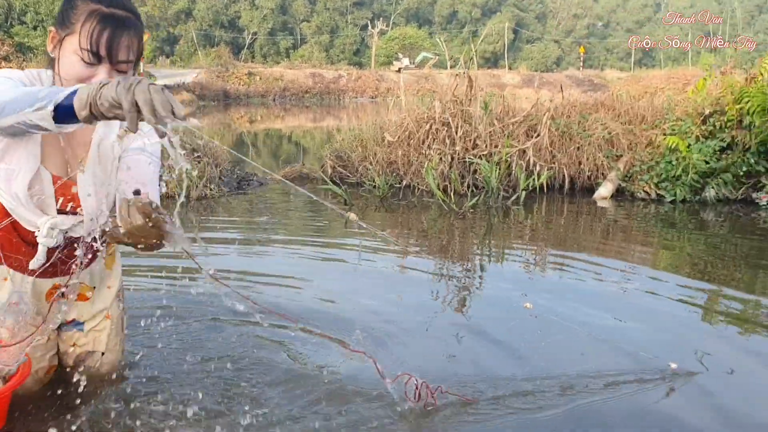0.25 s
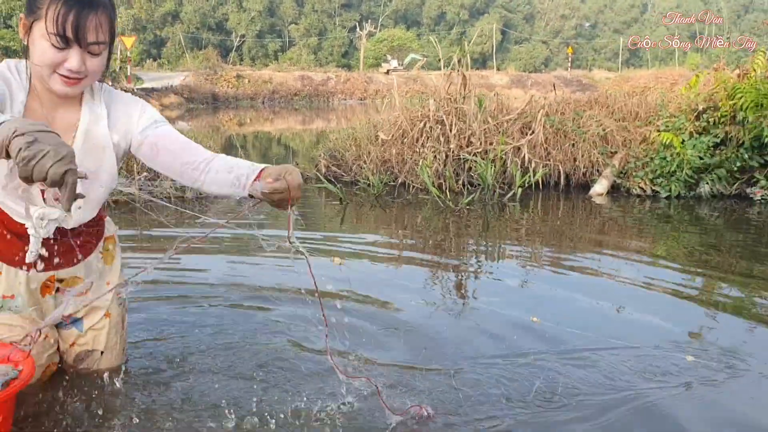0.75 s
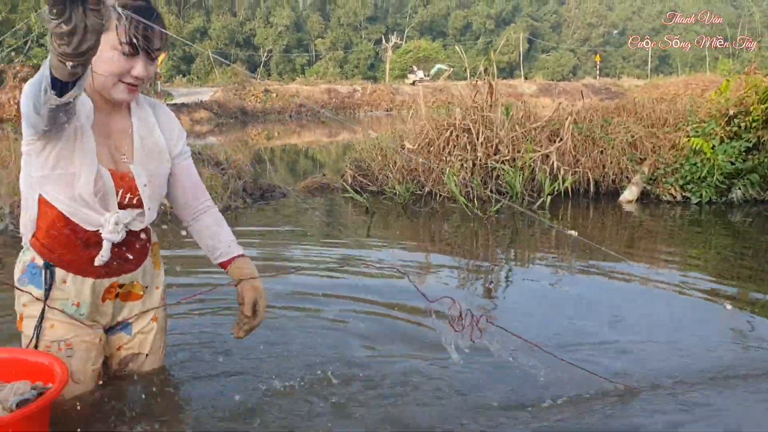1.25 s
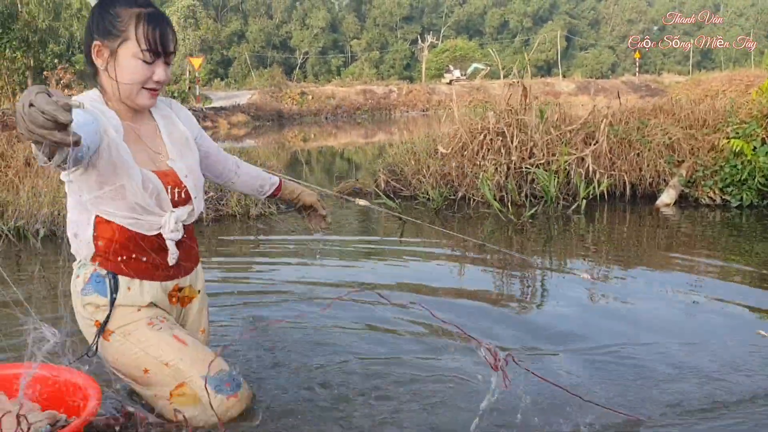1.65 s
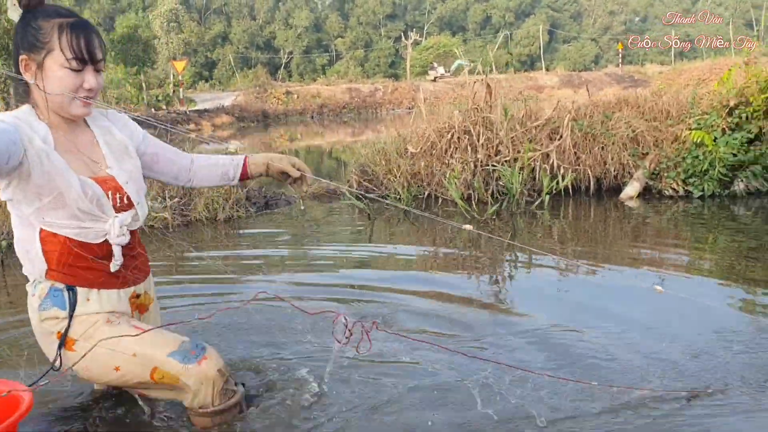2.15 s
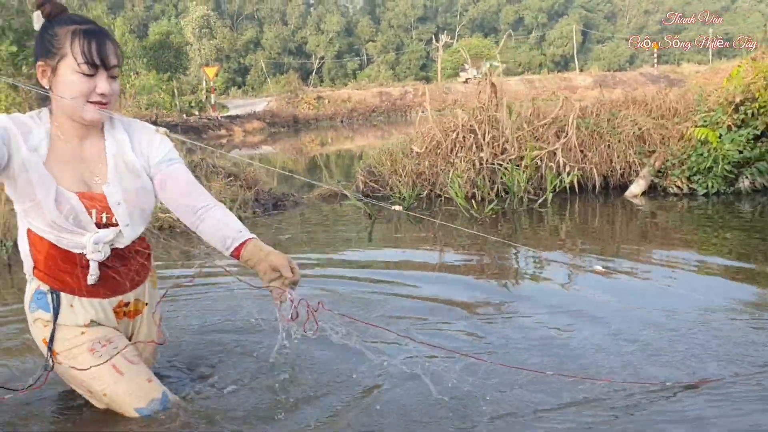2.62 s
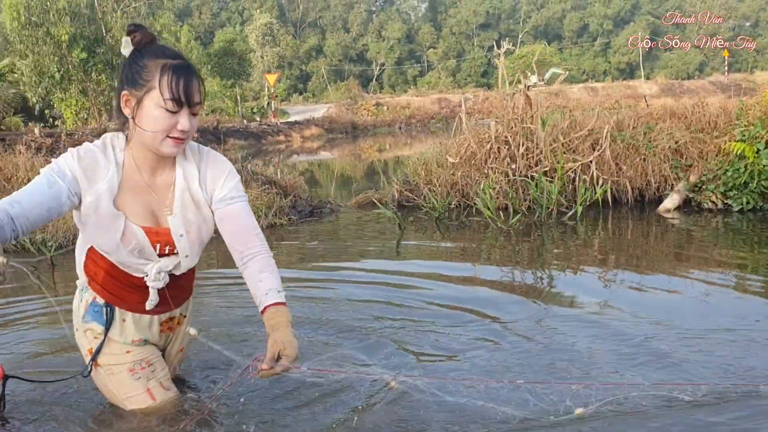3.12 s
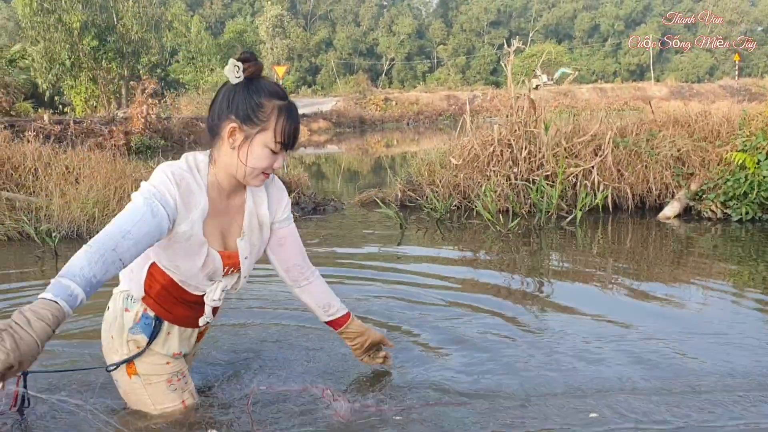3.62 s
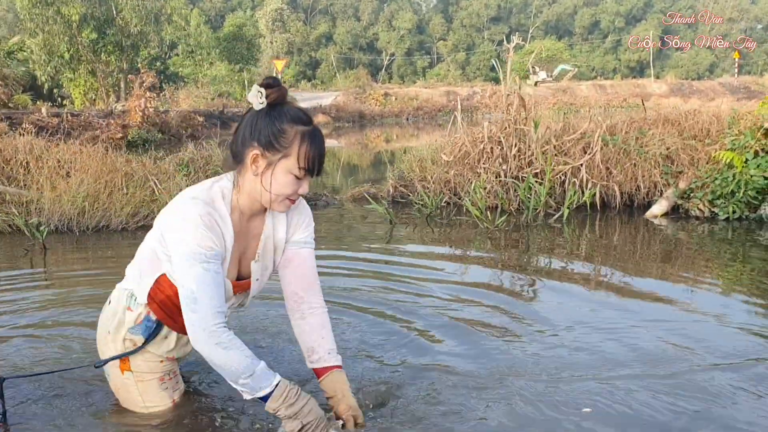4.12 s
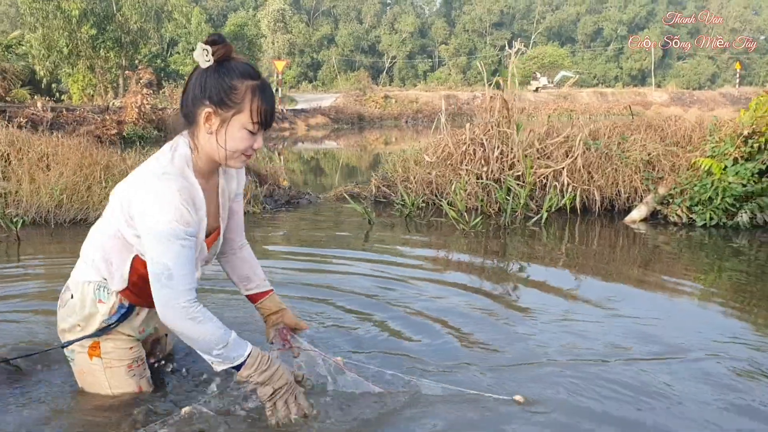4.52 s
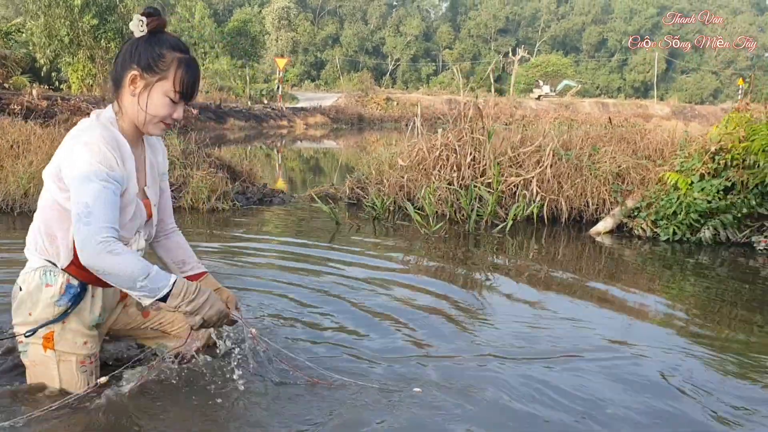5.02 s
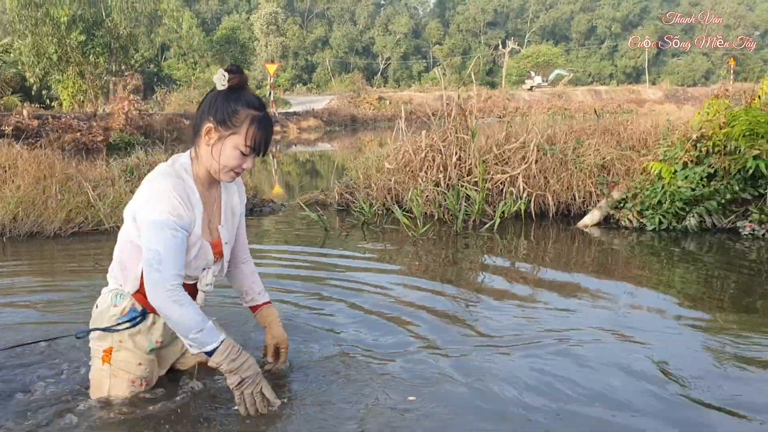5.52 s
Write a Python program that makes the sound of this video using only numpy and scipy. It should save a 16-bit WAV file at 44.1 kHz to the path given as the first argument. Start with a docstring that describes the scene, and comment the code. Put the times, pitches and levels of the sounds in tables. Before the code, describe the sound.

A person wades in a pond, heard close up outdoors. From 0 to 0.3 seconds water pours and sloshes with fizz and spray, then thins to drips. Bright, crisp droplet ticks cluster from 0.6 to 1.3, with small bubbles mostly rising in pitch. Rounder, deeper gurgles and plops come at 1.85 to 2.6. The water is mostly calm from 2.7 to 3.8, with one small swish near 3.3. Stirring returns at 3.8 to 4.4, and the strongest splashes come around 4.8 to 5.4, with more gurgles to 5.7. Low lumpy wind rumbles throughout, dipping and bumping near 3.6, while a far engine hum fades. High insects buzz in short bursts between 1.3 and 2.9, with a brief trill at 1.7 and a faint cricket afterwards. From 2.5 to 4.7 a distant bird repeats a soft, echoing note about four times a second, with two fainter reedy calls, over steady leafy hiss.

```python
"""Water sloshes, fizzes and drips close to the microphone as someone wades in a pond and hauls a line.
Drops tick as short damped tones, trapped bubbles ring, mostly rising in pitch; noise and grains make the rest.
Wind rumbles on the microphone as shaped noise and a far engine hums as narrow noise. A distant bird repeats
a soft note, with a reedier, fainter one beside it, both swept tones with echoes; three kinds of insect sing
on the bank as pulsed tones, before a steady far hiss of leaves and insect chorus."""
import sys
import numpy as np
from scipy import signal
from scipy.io import wavfile
from scipy.ndimage import uniform_filter1d

SR = 44100
rng = np.random.default_rng(int(sys.argv[2]) if len(sys.argv) > 2 else 0)


def put_to_file(sound):
    """Save the sound as 16-bit audio at rate SR, in the file named by the first command-line argument."""
    columns = np.atleast_2d(sound).T  # one column per channel
    safe = np.clip(columns, -1, 1)
    whole_steps = np.round(safe * 32767)
    wavfile.write(sys.argv[1], SR, whole_steps.astype(np.int16))


N = 254016
TIME = np.arange(N) / SR  # s

# All levels are set ahead of the microphone's own response.
# Large bubbles, close by. Each row: start in seconds, level in dB before wobble and surfacing gain,
# starting pitch in Hz, scale of the climb in octaves/s, ms until decay alone takes the ring down 60 dB.
BUBBLES = [(0.089, -27, 1043, 33.5, 51), (0.224, -23, 726, -11, 57), (0.302, -25.5, 289, 2.5, 140),
           (0.535, -30.5, 1095, 3, 81), (0.605, -41, 727, 18, 143), (0.7, -40, 1140, 8, 53),
           (0.754, -46.5, 596, 93, 91), (0.948, -23.5, 596, 6, 79), (0.971, -35, 806, 19.5, 105),
           (1.071, -28.5, 2130, -5, 28), (1.082, -35.5, 585, 19, 92), (1.093, -28, 1490, 28.5, 40),
           (1.113, -37, 518, 28.5, 123), (1.188, -27.5, 1510, 38, 20), (1.226, -32.5, 1080, 9, 47),
           (1.26, -42, 517, 72.5, 98.5), (1.281, -23.5, 1450, -4, 41), (1.313, -34.5, 1094, -3, 80),
           (1.845, -35.5, 357, 18, 140), (1.851, -26.5, 648, 19, 131), (1.866, -32.5, 890, 95, 52),
           (1.888, -20, 576, 10, 78), (1.904, -26, 523, 28.5, 80), (1.99, -31.5, 360, 10.5, 140),
           (2.168, -35, 717, 59.5, 70), (2.2, -30.5, 450, 12.5, 155), (2.253, -24.5, 433, 6, 73),
           (2.269, -19.5, 228.8, 9.5, 154), (2.411, -21.5, 1083, 26, 30), (2.527, -35, 702, 0, 141),
           (2.575, -38, 910, 19, 59), (2.923, -34.5, 647, 10, 89), (2.956, -47, 880, 61, 65),
           (4.035, -30.5, 295.4, 11, 152), (4.07, -31, 853, -2, 79), (4.731, -29, 332, 18, 98),
           (4.748, -25.5, 1127, -1, 62), (4.789, -23.5, 857, 8, 95), (5.011, -20.5, 862, 4, 57),
           (5.06, -18.5, 407, -4.5, 96), (5.027, -25.5, 270, 5.5, 109), (5.216, -22.5, 388, 12, 114),
           (5.256, -22, 625, 8, 69), (5.309, -25.5, 405.5, 25.5, 99), (5.53, -27, 1052, 19.5, 51),
           (5.67, -31, 643, -8, 86), (5.682, -28.5, 211, 8, 130)]
# Drops striking the surface, close by. Each row: start in seconds, level in dB before the onset and decay,
# centre in Hz, cycles until the ring is 60 dB down.
TICKS = [(0.062, -14, 4600, 16), (0.09, -20.5, 2110, 33), (0.12, -15.5, 3150, 37), (0.126, -20, 1810, 30),
         (0.219, -19.5, 3060, 35), (0.263, -17, 2100, 9), (0.283, -26, 2750, 22), (0.294, -24, 2050, 23),
         (0.315, -23.5, 1020, 31), (0.352, -23, 1260, 11), (0.4288, -21.5, 2360, 8),
         (0.5324, -20, 3020, 5.5), (0.605, -7, 8260, 1), (0.611, -22, 3380, 17), (0.6375, -9, 7460, 6),
         (0.652, -21, 3350, 20), (0.672, -17.5, 1640, 5.5), (0.712, -16, 3330, 5.5),
         (0.727, -13.5, 7740, 8), (0.7728, -13, 7700, 7), (0.835, -9, 10200, 4), (0.841, -17, 2840, 6),
         (0.902, -16, 2900, 30), (0.9063, 0, 12100, 12), (0.9102, 0, 6800, 3), (0.9495, -2, 4070, 8.5),
         (0.994, -15, 7629, 4), (1.0418, -16, 3130, 6), (1.054, -2.5, 12600, 5), (1.071, -11.5, 7629, 4),
         (1.0812, -7.5, 9800, 4), (1.1559, -13.5, 11100, 14), (1.1629, -17, 6800, 8),
         (1.297, -21.5, 2300, 8), (1.3153, -15, 9200, 13), (1.445, -34.5, 3440, 33),
         (1.599, -16.5, 6900, 5), (1.6063, -16, 11800, 18), (1.895, -26, 1800, 34),
         (1.9967, -18.5, 3800, 10), (2.036, -18.5, 820, 5), (2.051, -22, 1780, 26), (2.181, -21, 1380, 39),
         (2.29, -21, 1070, 25), (2.4023, -22.5, 2600, 17), (2.5012, -22, 4250, 5.5), (2.53, -25, 1380, 11),
         (3.164, -23.5, 2620, 12), (3.246, -27, 1220, 17), (3.263, -23.5, 1100, 17), (3.26, -28, 2340, 35),
         (3.44, -16, 1160, 12.5), (3.35, -36, 4300, 16), (3.766, -36, 2900, 22), (3.8116, -13, 7360, 5),
         (3.854, -26.5, 1160, 15), (3.884, -27.5, 406, 10), (3.9913, -14.5, 9800, 20),
         (4.002, -28, 5500, 34), (4.0706, -14, 2330, 10), (4.1606, -18, 4700, 13), (4.196, -20, 6400, 2.5),
         (4.244, -18.5, 1250, 15), (4.265, -21.5, 1200, 26), (4.292, -15.5, 7760, 8),
         (4.301, -21, 1020, 11), (4.409, -25.5, 1303, 38), (4.464, -26, 2190, 37), (4.626, -16, 2730, 7),
         (4.651, -10.5, 2960, 7), (4.684, -21, 1940, 6), (4.705, -22, 2200, 10), (4.7816, -18, 524, 18),
         (4.734, -14.5, 3080, 10), (4.7825, -15.5, 3080, 13), (4.803, -9.5, 3530, 13),
         (4.825, -13, 1310, 5), (4.866, -14, 3300, 13), (5.122, -17.5, 244, 11.5), (5.132, -15, 2120, 10),
         (5.15, -20.5, 3160, 26), (5.295, -13, 595, 9), (5.3125, -12.5, 3730, 9),
         (5.4123, -11.5, 2800, 4.5), (5.542, -20, 1600, 13)]
# Moves that stir the water. Each row: start in seconds, hold in seconds, then gurgle, fizz and spray
# at the start in dB per octave, before the edge shaping.
MOVES = [(0, 0.31, -39, -35.5, -41), (0.427, 0.041, -59, -53.5, -50.5), (0.608, 0.078, -53, -45, -44.5),
         (0.788, 0.52, -56, -52.5, -52.5), (1.37, 0.95, -60.5, -60.5, -67), (1.65, 0.038, -68, -52.5, -60),
         (1.884, .19, -35.5, -43.5, -57), (2.166, 0.16, -39.5, -42, -55), (2.366, 0.16, -43.5, -59, -62),
         (3.267, 0.006, -44, -53, -75), (3.33, 0.23, -78, -61.5, -64), (3.838, 0.512, -43, -43, -55),
         (4.416, 0.98, -49.5, -45, -56.5), (4.786, 0.17, -34, -35, -49), (5.001, 0.38, -31, -37, -45.5),
         (5.519, 0.035, -47, -49, -57.5), (5.635, 0.15, -47, -52.5, -59.5)]
# Calm water: gurgle, fizz and spray in dB per octave, before the edge shaping.
CALM_DB = [-56, -65.5, -71]
# How fast gurgle, fizz and spray die after a move, in dB/s.
SETTLE_DB_PER_S = [226, 144, 147]
SWELL_DB_PER_S, SAG_DB_PER_S = 222, 5  # before and during a move
# Centres of gurgle, fizz and spray, in Hz.
BAND_HZ = [756, 1980, 5770]
# Edge shaping of the stirred water. Each row: frequency in Hz, gain in dB.
STIR_EDGES = [(150, -106), (300, -5.5), (10000, 6.5), (16000, 2.5)]
SURFACING_DB_PER_OCTAVE = 11.0  # a bubble is heard better as it nears the surface
BURST_OCTAVES = 1.7  # a bubble bursts once it has climbed this far
WOBBLE_DB = 2.2  # rms

# Wind spectrum at the microphone. Each row: frequency in Hz, relative level in dB per Hz.
WIND_SPECTRUM = [(18, -45), (30, -7), (70, 2.5), (129, -5.5), (204, -10.5), (351, -24), (650, -40),
                 (1100, -120)]
# Strength of the gusts. Each row: time in seconds, rumble level in dB.
GUSTS = [(0.0, -38.5), (1.78, -42.5), (1.88, -39), (3.42, -44.5), (3.58, -34), (3.66, -55), (3.72, -36),
         (3.9, -39.5), (3.97, -41), (5.31, -39), (5.76, -45)]
# Far engine. Each row: time in seconds, hum level in dB.
HUM_LEVELS = [(0, -38), (2.2, -45), (5.76, -60)]

# Distant bird. Each row: middle in seconds, level in dB, glide from start to end in Hz before the arch.
NOTES = [(2.546, -47, 16), (2.787, -48, 16), (3.035, -47, -73), (3.268, -45, -2), (3.487, -46, 422),
         (3.733, -47.5, 426), (3.975, -61, 302), (4.215, -40, 295), (4.469, -48, -60), (4.712, -44, 12)]
# Its soft note: length in seconds, pitch in Hz before the arch, overtones in dB below the note.
NOTE = (.065, 1540, -28)
# A second, reedier bird. Each row: middle in seconds, level in dB, glide in Hz before the arch.
LONG_CALLS = [(2.97, -60.5, 30), (3.52, -63, 30)]
# Its reedy note: length in seconds, pitch in Hz before the arch, overtones in dB below the note.
REED = (.19, 1570, -4)
# Fainter notes after each soft one. Each row: delay in seconds, dB relative to that note, glide in Hz,
# length in seconds, pitch in Hz before the arch, overtones in dB below the trailing note.
TRAIL = [(.06, -10, 150, .04, 1900, -30), (.09, -11, -260, .1, 1370, -30)]

# Buzzing insect on the bank. Each row: start in seconds, end in seconds, first Hz, Hz it settles towards,
# level in dB before the swell and the stroke shape.
BUZZES = [(1.33, 1.705, 10740, 10700, -48), (1.82, 2.318, 10520, 10760, -45),
          (2.43, 2.93, 10350, 10900, -49)]
# Far hiss. Each row: frequency in Hz, relative level in dB per Hz.
AIR_SPECTRUM = [(150, -28), (250, 11), (860, -12), (1450, -2), (1700, -15), (1910, -6.5), (3460, -26.5),
                (6590, -13.5), (7840, -9), (9170, -15), (10500, 4.5), (12100, -18), (14400, -20),
                (16000, -50)]
AIR_DB = -53  # rms


def amp(db):
    """Decibels to gain."""
    return 10 ** (np.asarray(db) / 20)


def unit(x):
    """Scales to rms 1."""
    return x / np.sqrt(np.mean(x ** 2) + 1e-20)


def smooth_noise(count, size):
    """Slow random drift of rms 1: white noise averaged over size samples."""
    return unit(uniform_filter1d(rng.standard_normal(count), size=size))


def read(points, hz):
    """Reads a spectrum on a log-frequency axis."""
    f, value = np.transpose(points)
    return np.interp(np.log(hz + 1), np.log(f + 1), value)


def sine(hz):
    """A sine that follows a pitch track in Hz."""
    return np.sin(2 * np.pi * np.cumsum(hz) / SR)


def add(mix, s, sound):
    """Mixes a sound in at time s."""
    part = mix[round(s * SR):][:len(sound)]
    part += sound[:len(part)]


def resonate(x, hz, width):
    """A resonance: shifts hz down to zero, smooths twice over width Hz and shifts back."""
    turn = np.exp(2j * np.pi * np.cumsum(hz * np.ones(len(x))) / SR)
    r = np.exp(-np.pi * width / SR)
    smoothed = signal.lfilter([(1 - r) ** 2], [1, -2 * r, r * r], x / turn)
    return 2 * (turn * smoothed).real


def noise(field_db, size, patchy_db):
    """Random short-time spectra under field_db(Hz, s), with drifting patches."""
    frames = 4 * N // size + 5
    hz = np.fft.rfftfreq(size, 1 / SR)
    frame_s = np.arange(frames) * size / 4 / SR
    real, imaginary, patches = rng.standard_normal((frames, len(hz), 3)).T
    patches = uniform_filter1d(patches, size=5, axis=0)  # across frequency
    patches = unit(uniform_filter1d(patches, size=7, axis=1))  # across time
    spectra = (real + 1j * imaginary) * amp(field_db(hz, frame_s) + patchy_db * patches)
    return signal.istft(spectra, nperseg=size, noverlap=3 * size // 4)[1][:N] / np.sqrt(size)


def ring(hz, t60, rise):
    """A pocket of air rings and dies; a rising one climbs as it nears the surface, and can burst there."""
    t = np.arange(round(t60 * SR) + 8) / SR
    octaves = rise * t * (0.543 + 1.6 * t / t60)  # the pitch change steepens
    pitch = np.minimum(hz * 2 ** octaves, SR / 2.2)
    alive = np.clip(4 * (BURST_OCTAVES - octaves), 0, 1)
    onset = 1 - np.exp(-t / (0.028 * t60))
    decay_db = -60 * (t / t60) ** 1.016
    return alive * onset * amp(SURFACING_DB_PER_OCTAVE * octaves + decay_db) * sine(pitch)


def bubbles():
    """Large bubbles heard one by one, each a ringing pocket of air."""
    out = np.zeros(N)
    for s, db, hz, rise, ring_ms in BUBBLES:
        bubble = ring(hz, ring_ms / 1000, rise)[:9000]
        wobble = smooth_noise(9000, 200)[:len(bubble)]  # ripples pass over it
        add(out, s, amp(db + WOBBLE_DB * wobble) * bubble)
    return out


def ticks():
    """Drops that strike the surface: a damped ring each, with two droplets and a little spray."""
    out = np.zeros(N)
    t = np.arange(900) / SR
    for s, db, hz, cycles in TICKS:
        tick = ring(hz, cycles / hz, 0)
        add(out, s, amp(db) * tick)
        for late, size in rng.random((2, 2)):  # two droplets fall back close by
            droplet = ring(hz * 1.6 ** (size - 0.5), cycles / hz, 0)
            add(out, s + 0.022 * late, amp(db - 8.0) * droplet)
        spray = unit(resonate(rng.standard_normal(900), hz, 9000.0))
        strength = amp(db) * np.linalg.norm(tick) * 2.73 / cycles  # shorter rings spray more
        add(out, s, amp(-13.0 - 60 * t / 0.025) * strength * spray)
    return out


def stirring():
    """Levels of gurgle, fizz and spray: each move swells fast, sags while it holds and settles to calm."""
    s = np.arange(0, N / SR + 0.1, 0.005)
    power = amp(2 * np.array(CALM_DB))[:, None]
    for start, hold, *db in MOVES:
        early = np.maximum(start - s, 0)
        held = np.clip(s - start, 0, hold)
        late = np.maximum(s - start - hold, 0)
        loss = SWELL_DB_PER_S * early + SAG_DB_PER_S * held + np.outer(SETTLE_DB_PER_S, late)
        power = power + amp(2 * (np.array(db)[:, None] - loss))
    return s, *(10 * np.log10(power))


def stir_db(hz, t):
    """Level per octave of the stirred water, blended between its three bands; the slope goes on above."""
    s, *bands = stirring()
    shares = [np.interp(np.log(hz + 1), np.log(BAND_HZ), row) for row in np.eye(len(bands))]
    above = 0.22 * np.log2(np.maximum(hz / BAND_HZ[-1], 1))
    shares[1:] = shares[1] - above, shares[2] + above
    blend = sum(np.outer(share, np.interp(t, s, band)) for share, band in zip(shares, bands))
    return blend + read(STIR_EDGES, hz)[:, None]


def busy():
    """0 on calm water, 1 while it breaks, judged from the fizz."""
    s, _, fizz_db, _ = stirring()
    return np.clip((np.interp(TIME, s, fizz_db) + 66) / 14, 0, 1)


def churn(count, low_per_s, high_per_s, spread_db, clump_db):
    """A crowd of small bubbles of all sizes; small ones are many and short, and their loudness clumps."""
    out = np.zeros(N)
    clumps = smooth_noise(N + 1200, 1200)[:N] * busy()
    for k, hz in enumerate(np.geomspace(200, 15000, count)):
        small = k / (count - 1)
        per_s = low_per_s * (high_per_s / low_per_s) ** small
        at = np.flatnonzero(rng.random(N) < per_s / SR)
        spread = np.minimum(rng.exponential(1, N)[at], 3.5)
        sizes = amp(spread_db * spread + clump_db * small ** 0.5 * clumps[at])
        cycles = 44 * (22 / 44) ** small * rng.uniform(0.55, 1.6)  # until the ring is 60 dB down
        grain = ring(hz, cycles / hz, 1.2 * rng.random() ** 2 * hz / cycles)
        even_power = np.sqrt(SR / np.mean(sizes ** 2) / per_s)
        train = np.zeros(N)
        train[at] = sizes * amp(stir_db(np.array([hz]), TIME[at])[0]) * even_power
        out += signal.oaconvolve(train, grain / np.linalg.norm(grain))[:N]
    return amp(-0.97) * out * np.sqrt(np.log2(75) / count)  # the crowd spans a 75-fold range of pitch


def wash():
    """The blur of bubbles too many to tell apart, flickering as the water breaks."""
    def field_db(hz, t):
        per_hz = 10 * np.log10(hz + 50)[:, None]  # from level per octave to level per Hz
        return stir_db(hz, t) - per_hz + 25.5

    flicker = smooth_noise(N + 300, 300)[:N]
    return noise(field_db, size=256, patchy_db=3) * amp(3.5 * busy() * flicker)


def wind():
    """Lumpy low rumble of gusts on the microphone: shaped noise that follows their strength."""
    rumble = unit(noise(lambda hz, t: read(WIND_SPECTRUM, hz)[:, None], size=4096, patchy_db=2.0))
    return rumble * amp(np.interp(TIME, *np.transpose(GUSTS)))


def engine():
    """A far engine: noise through a narrow resonance makes a fading, unsteady hum."""
    hum = unit(resonate(rng.standard_normal(N), hz=76.0, width=9.0))
    return hum * amp(np.interp(TIME, *np.transpose(HUM_LEVELS)))


def bird():
    """Distant wavering whistles with two overtones; soft notes trail two fainter ones, and all echo."""
    calls = [(*row, *NOTE) for row in NOTES] + [(*row, *REED) for row in LONG_CALLS]
    for s, db, _ in NOTES:
        calls += [(s + delay, db + weaker_db, *rest) for delay, weaker_db, *rest in TRAIL]
    out = np.zeros(N)
    for s, db, glide, length, hz, over_db in calls:
        u = np.linspace(-1, 1, round(length * SR))
        waver = smooth_noise(len(u), 300)
        droop = 0.06 + 0.17 * (length < 0.1)  # short notes scoop up and droop most
        pitch = (1 - droop * u ** 2 + 0.012 * waver) * (hz + glide * u / 2)
        tone = sine(pitch) + amp(over_db) * (sine(2 * pitch) + sine(3 * pitch))
        add(out, s - length / 2, amp(db) * tone * np.hanning(len(tone)))
    echo_s = np.arange(12000) / SR
    echoes = rng.standard_normal(12000) * amp(-60 * echo_s / 0.38)  # off the tree line
    return out + amp(-20.0) * signal.oaconvolve(out, echoes / np.linalg.norm(echoes))[:N]


def strokes(t, per_s, duty):
    """Smooth bumps that repeat per_s times a second; also the place 0-1 inside each bump."""
    place = np.minimum(t * per_s % 1 / duty, 1)
    return np.sin(np.pi * place), place


def scrape(shape, hz, width):
    """Wing strokes: a tone under the given shape whose pitch wanders by width Hz rms."""
    wander = unit(signal.lfilter([1], [1, -0.93], rng.standard_normal(len(shape))))
    return shape * np.sqrt(2) * sine(hz + width * wander)


def buzzer():
    """A buzzing insect: fast wing strokes, each falling in pitch, swelling in at the start of a buzz."""
    out = np.zeros(N)
    for start, end, first_hz, last_hz, db in BUZZES:
        t = np.arange(0, end - start, 1 / SR)
        shape, place = strokes(t, per_s=145.0, duty=0.7)
        settling = last_hz + (first_hz - last_hz) * np.exp(-t / 0.23)
        hz = settling + 830.0 * (0.5 - place)  # each stroke falls in pitch
        swell = np.minimum(0.5 + t / 0.17, 1)
        add(out, start, amp(db) * swell * scrape(shape, hz, width=265.0))
    return out


def cricket():
    """A slow cricket: separate wing strokes on one tone, weakening by 3 dB each second."""
    out = np.zeros(N)
    t = np.arange(0, 4.0, 1 / SR)
    chirps = signal.windows.tukey(len(t), 0.05) * amp(-3.0 * t) * strokes(t, per_s=16.75, duty=0.42)[0]
    add(out, 1.763, amp(-57) * scrape(chirps, 8050.0, width=60.0))
    return out


def triller():
    """A trilling insect: fast wing strokes gathered into slower pulses."""
    out = np.zeros(N)
    t = np.arange(0, 0.93, 1 / SR)
    pulses = strokes(t, per_s=8.47, duty=0.66)[0] ** 0.3
    trill = np.minimum(0.3 + 6 * t, 1) * strokes(t, per_s=124.5, duty=0.6)[0] * pulses
    add(out, 1.737, amp(-52.5) * scrape(trill, 8950.0, width=170.0))
    return out


def air():
    """Steady far hiss of leaves and the insect chorus, as shaped noise."""
    return amp(AIR_DB) * unit(noise(lambda hz, t: read(AIR_SPECTRUM, hz)[:, None], size=1024, patchy_db=2.5))


def scene():
    """Everything at one microphone, from the near water to the far air."""
    small_bubbles = churn(count=56, low_per_s=32.0, high_per_s=320.0, spread_db=3.5, clump_db=3.0)
    water = bubbles() + ticks() + small_bubbles + wash()
    insects = buzzer() + cricket() + triller()
    return (water + wind() + engine() + bird() + insects + air())[None]


def record(dry):
    """The microphone cuts the deepest bass, the treble rolls off, then the band limit."""
    dry = signal.sosfilt(signal.butter(4, 36.0, "high", fs=SR, output="sos"), dry)
    corner_hz = [0, 14600, 15500, 16300, SR / 2]
    gains = [1, 0.54, 0.0, 0, 0.019]  # a trace remains at the very top
    taps = signal.firwin2(511, corner_hz, gains, fs=SR, window=("kaiser", 8))
    return signal.oaconvolve(dry, taps[None], "same")


dry = scene()
out = record(dry)
put_to_file(out)
```